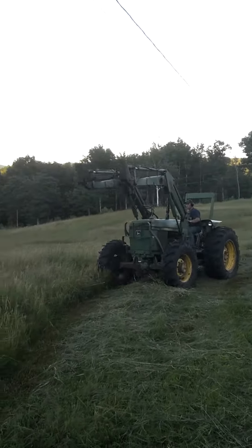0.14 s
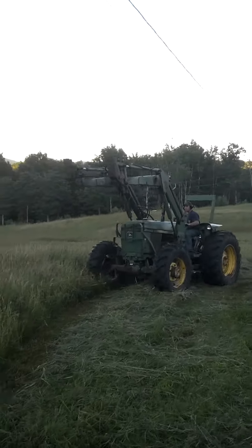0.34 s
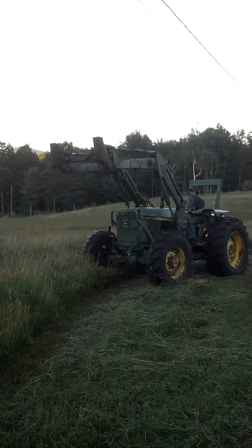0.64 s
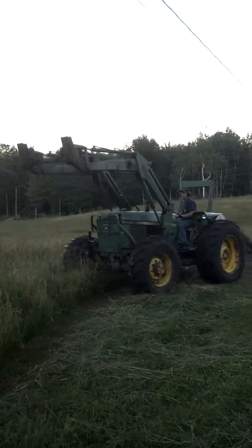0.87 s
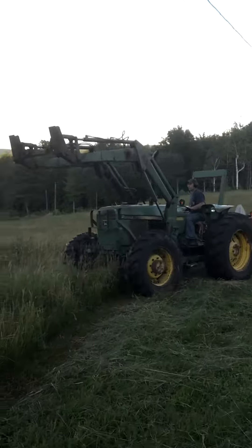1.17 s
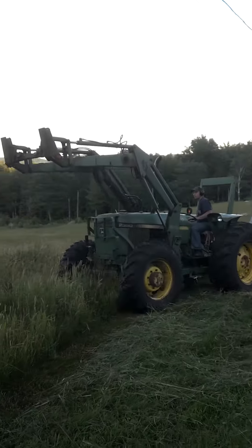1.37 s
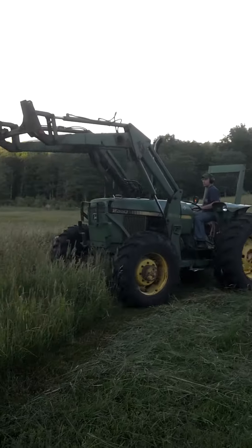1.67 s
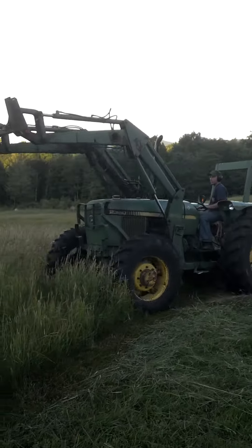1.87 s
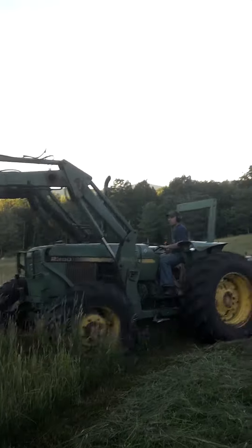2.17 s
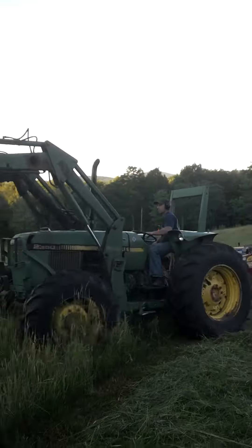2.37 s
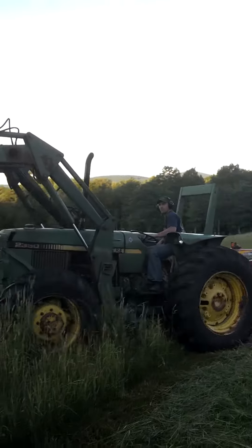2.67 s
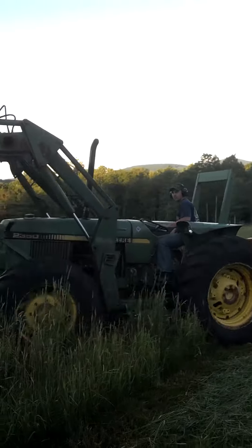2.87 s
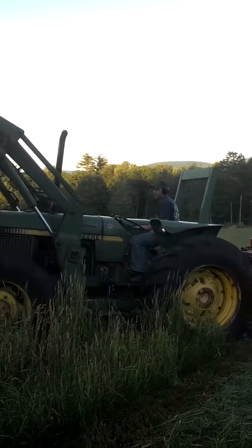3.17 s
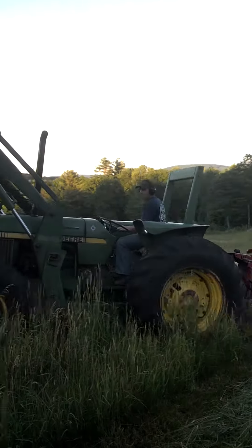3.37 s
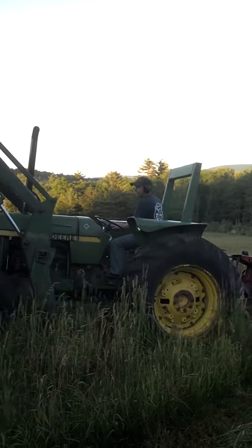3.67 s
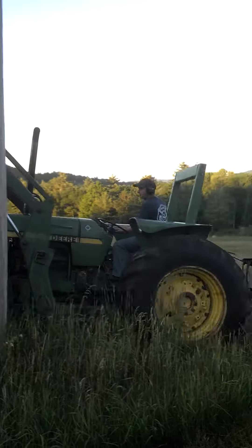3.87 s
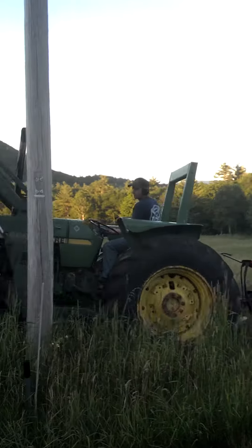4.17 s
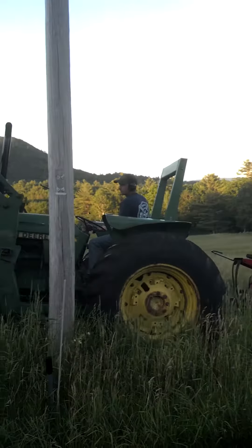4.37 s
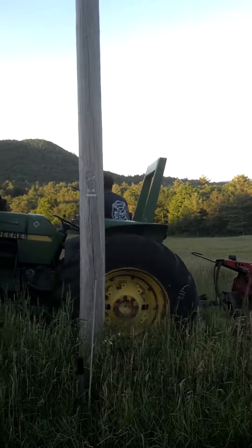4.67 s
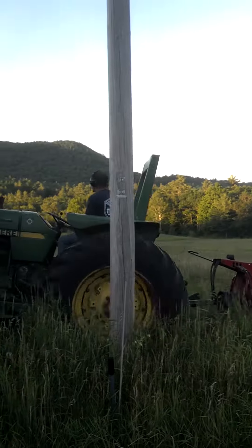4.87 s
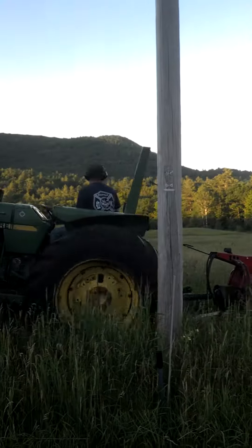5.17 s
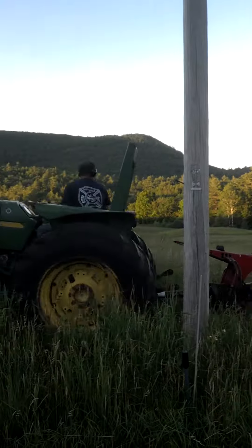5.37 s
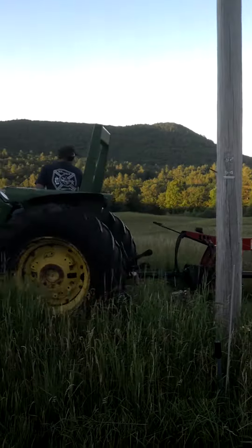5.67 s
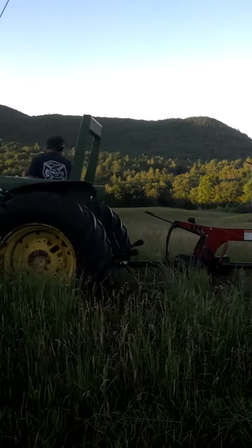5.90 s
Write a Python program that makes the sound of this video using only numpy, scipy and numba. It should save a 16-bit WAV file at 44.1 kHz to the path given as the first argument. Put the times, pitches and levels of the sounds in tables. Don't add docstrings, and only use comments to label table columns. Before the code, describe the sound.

An old diesel tractor works past in an open hayfield, already loud at the start and never stopping. Low exhaust drone and quick hard engine knocks run throughout, with fan hum, a broad mower rush, loose rattles and metal ticks. The fan fades as the tractor turns its flank, and engine speed sags slightly late. Handheld phone at the field edge, stereo, dry outdoors, with only a faint wind puff.

```python
import sys
import numpy as np
from scipy import signal
from scipy.fft import rfft, irfft
from scipy.io import wavfile
from scipy.ndimage import uniform_filter1d
from numba import njit

SR = 44100
rng = np.random.default_rng(int(sys.argv[2]) if len(sys.argv) > 2 else 0)


def inscribe(sig):
    pcm = np.round(np.clip(np.atleast_2d(sig).T, -1, 1) * 32767)
    wavfile.write(sys.argv[1], SR, pcm.astype(np.int16))


def ratio(d):
    e = np.asarray(d, float) / 20
    return 10 ** e


N = 266364
COARSE = 8

# pitch_hz, level_db, likeness (0-1), lag_samples
FAR_PORT = [(90, 0.2, 1, 1.6), (200, 2.5, 0.95, 3.6), (353, -7, 0.96, 12.6), (550, 0, 1, 0.63),
            (816, -10.5, 0.76, 3.6), (1950, 0.5, 0.79, 8.9), (3030, -8, 0, 10.1), (7200, -13, 0.06, 15),
            (9900, -3.5, 0.24, 10.6), (13950, 3.5, 0.7, 39)]
KNOCK_DB = (-10, -6.5, -6.5, -7.5)


def level(x, db):
    return x * ratio(db) / np.sqrt(np.mean(x ** 2))


def curves(table):
    s, *columns = np.transpose(table)
    return [np.interp(np.arange(N) / SR, s, c) for c in columns]


def at_hz(table, hz, column=1):
    rows = np.array(table)
    return np.interp(np.log(hz), np.log(rows[:, 0]), rows[:, column])


def aspect(values):
    facing_s = (0.14, 1.5, 4, 5.5)
    return np.interp(np.arange(N) / SR, facing_s, values)


@njit
def resonate(x, g, k):
    y, b, l = np.empty(len(x)), 0., 0.
    for i in range(len(x)):
        v = (b + g[i] * (x[i] - l)) / (1 + g[i] * (g[i] + k[i]))
        b, l, y[i] = 2 * v - b, l + 2 * g[i] * v, k[i] * v
    return y


def svf(x, hz, width):
    return resonate(x, np.tan(np.pi * hz / SR) * np.ones(N), width / hz * np.ones(N))


def shape(x, response):
    pad = 4096
    padded = np.pad(x, ((0, 0), (pad, pad)), mode="reflect")
    hz = np.fft.rfftfreq(padded.shape[1], 1 / SR) + 1
    return irfft(rfft(padded) * response(hz), padded.shape[1])[:, pad:-pad]


def walk(rate, every=1):
    hold = int(SR / 64 / rate)
    held = np.repeat(rng.standard_normal(N // 64 // hold + 2), hold)
    slewed = uniform_filter1d(uniform_filter1d(held, hold), hold)
    return 1.3 * np.interp(np.arange(0, N, every) / 64, np.arange(len(slewed)), slewed)


def tone(turns, db, start=None):
    free = rng.random()
    return np.sqrt(2) * ratio(db) * np.cos(2 * np.pi * (turns + (free if start is None else start)))


def steady(curve):
    return uniform_filter1d(curve, size=SR // 6)


def wind():
    # start_s, level_db, pitch_hz
    puffs = [
        (.70, -52, 90),
    ]
    t = np.arange(N) / SR
    out = np.zeros((2, N))
    for s, db, hz in puffs:
        swell = ratio(db) * np.exp(-((t - s) / 0.017) ** 2)
        rumble = ratio(-81 + 3.2 * walk(5.7))
        out += (swell + rumble) * [level(svf(rng.standard_normal(N), hz, 110.0), 0) for _ in range(2)]
    return out


def ground(ports):
    # start_s, lag_ms, share
    bounce = [
        (0, 1.9, 0.094),
        (.5, 2.16, 0.14),
        (1.4, 2.48, 0.16),
        (2.1, 2.88, 0.18),
        (3.1, 3.52, 0.22),
        (4.2, 3.524, 0.16),
        (5.4, 3.66, 0.2),
        (6.04, 3.23, 0.25),
    ]
    lag_ms, share = curves(bounce)
    place = np.arange(N) - steady(lag_ms) * SR / 1000
    dull = signal.lfilter(*signal.butter(1, 7000, fs=SR), ports)
    return ports + share * [np.interp(place, np.arange(N), row) for row in dull]


def panels(ports):
    # pitch_hz, share, centre_s, half_span_s
    broad = [(630, 0.87, 0.19, 0.17), (805, -0.38, 0.23, 0.37), (456, 0.48, 2.2, 0.3),
             (7760, -0.5, 1.1, 0.42), (7800, -0.83, 2, 0.28), (7700, 0.15, 3.7, 0.071),
             (327, -0.89, 3.55, 0.11), (538, -0.33, 5.15, 0.12), (1540, 0.19, 1.3, 0.23),
             (206, 0.55, 0.44, 0.13), (1070, -0.092, 4.9, 0.2), (235, -0.61, 1.7, 0.15),
             (235, -.75, 0.78, 0.088), (161, -.4, 0.7, 0.24), (3100, 0.32, 3.7, 0.11),
             (550, -.35, 3.05, .12), (1100, -.25, 4.25, .12), (1100, -.25, 2.8, .12),
             (1740, 0.24, 2.42, 0.16), (1840, 0.25, 4.8, 0.22), (1130, -0.35, 0.75, .12),
             (3100, .5, 1.33, .13), (1550, .3, 3.52, .12), (560, .4, 1.58, .12), (780, .4, 5.48, .13),
             (1550, -.25, 1.1, .12), (11210, -1.17, 2, 1.8), (7930, -0.84, 0.79, 0.8), (657, 0.38, 3, 0.73),
             (4930, 0.36, 2.4, 0.39), (3440, 0.59, 2.65, 0.76), (2720, -0.44, 5.4, 0.48),
             (775, -0.36, 2.9, 0.42), (1870, 0.015, 3.57, 0.44), (368, -0.063, 3.7, 0.48),
             (14040, 1, 3.4, 0.59), (1830, -0.91, 4.15, 0.22), (1920, 0.38, 5.15, 0.23),
             (449, 0.71, 4.9, 1.1), (670, 0.55, 5.2, 0.97), (7200, 0.46, 5.65, 0.062)]
    # pitch_hz, share, centre_s, half_span_s
    thin = [(1024, 0.62, 1.2, 0.42), (482, 1, .9, .2), (476, 0.41, 2.04, 0.19), (1070, 1.3, 1.35, .15),
            (860, .7, 4.25, .15), (560, .7, 4.15, .2), (1030, 1.1, .8, 0.092), (680, .9, 5.5, .2),
            (668, 0.64, 0.74, 0.56), (606, 0.73, 5.16, 0.18), (1210, 0.77, 5.37, 0.14),
            (1310, 0.55, 1.5, 0.1), (652, 0.76, 2.6, 0.78), (1130, 0.92, 0.2, 0.24),
            (1280, 1.1, 1.93, 0.18), (1320, 0.5, 2.47, 0.21), (650, 0.55, 1.5, 0.41),
            (1735, .8, 2.41, 0.14), (1830, 0.74, 2.55, 0.31), (607, 0.92, 2.82, 0.22),
            (2020, 0.87, 3.43, 0.16), (1800, 0.52, 3.4, 0.21), (1480, 0.72, 3.57, 0.21),
            (848, 1.2, 4.06, 0.28), (1430, 0.38, 4.2, 0.089), (1894, 0.94, 4.44, 0.38),
            (1157, 0.44, 4.8, 0.089), (860, 0.87, 5.2, 0.55), (1970, 0.79, 5.33, 0.12),
            (1484, 1, 5.76, 0.19)]
    t, out = np.arange(N) / SR, ports.copy()
    for rows, q in ((broad, 9.6), (thin, 36)):
        for hz, share, s, span in rows:
            near = np.abs(t - s) < 3 * span
            rung = signal.lfilter(*signal.iirpeak(hz, q, fs=SR), ports[:, near])
            out[:, near] += share * np.exp(-((t[near] - s) / span) ** 2 / 2) * rung
    return out


def fan():
    blade_hz = 95.7
    blade_db, octave_db = (-41.5, -41.5, -51, -61), (-42, -40, -50, -47)
    turns = np.cumsum(blade_hz + 0.39 * walk(1.584)) / SR
    blade = tone(turns, aspect(blade_db) + 0.35 * walk(2.5))
    octave = tone(2 * turns + 0.066 * walk(6.7), aspect(octave_db) + 2 * walk(4.7))
    return blade + octave


def clatter(rate=400, tail_s=0.004):
    struck = rng.random(N) < rate / SR
    ticks = struck * ratio(np.minimum(2 * rng.exponential(size=N), 6))
    return level(signal.lfilter([1], [1, -np.exp(-1 / (tail_s * SR))], ticks), 0)


def hard_blows():
    # start_s, peak_db
    blow_peaks = [(0.1476, -18), (0.4484, -21), (0.5013, -10), (0.6903, -17), (0.7143, -18), (0.7831, -21),
                  (1.1313, -14), (1.1578, -14.5), (1.3334, -20), (1.3633, -23), (1.4351, -30),
                  (1.5229, -21), (1.6876, -14), (1.7744, -18), (1.8886, -16.5), (1.9759, -23.5),
                  (2.2792, -16.5), (2.3426, -16.5), (2.3932, -20), (2.4438, -16), (2.596, -13.5),
                  (2.6479, -20), (2.6973, -19), (2.7995, -17), (2.8394, -15), (2.9008, -14), (2.9267, -17),
                  (2.9522, -20), (3.0021, -24), (3.1043, -19), (3.1552, -14), (3.2046, -14), (3.2829, -14),
                  (3.3064, -15), (3.4087, -16), (3.4595, -7), (3.5344, -8), (3.6865, -15.5), (3.8132, -11),
                  (3.8392, -8), (3.8636, -21), (3.914, -12), (4.4727, -6), (4.7277, -18), (4.7805, -15),
                  (4.9601, -14), (4.9856, -12.5), (5.0634, -16), (5.1163, -11), (5.1806, -18),
                  (5.233, -9.5), (5.2959, -11), (5.3956, -15.5), (5.5233, -20.5), (5.6002, -21),
                  (5.7019, -16), (5.8042, -14.5), (5.906, -18), (5.9564, -14.5), (6.0077, -16)]
    lift_db, tail_s = 18, 0.003
    s, db = np.transpose(blow_peaks)
    power = ratio(2 * (np.minimum(db, -14) + lift_db))
    hits = np.bincount((s * SR).astype(int), power, N)
    return signal.lfilter([1], [1, -np.exp(-1 / (tail_s * SR))], hits)


def jolts():
    # centre_s, level_db
    clumps = [(0.049, 2), (.15, 4), (.61, 0), (0.729, 4), (.79, 0.5), (.9, 1.5), (1.01, -1.5), (1.18, 2.5),
              (1.51, -1), (1.64, 1), (1.8, -1.5), (2.03, 0), (2.17, 1.5), (2.45, 0.5), (2.6, 0), (2.68, -1),
              (2.86, 1.5), (3.02, 0), (3.18, -0.5), (3.31, 2), (3.45, 0.5), (3.54, -2), (3.63, 2.5),
              (3.7, 2.5), (3.97, -1), (4.12, -1), (4.22, -1.5), (4.62, 3), (4.74, -0.5), (4.87, 0.5),
              (5.03, -1), (5.11, 2.5), (4.47, 2), (5.17, 0), (5.25, 1.5), (5.4, -0.5), (5.58, -2.5),
              (5.7, 0), (5.96, 2), (6.02, 1)]
    half_span_s = 0.013
    t = np.arange(0, N, 64) / SR
    swing_db = sum(db * np.exp(-((t - s) / half_span_s) ** 2 / 2) for s, db in clumps)
    return np.interp(np.arange(N) / SR, t, swing_db)


def knock(cycle, decay=0.39, uneven=0.88, size=24):
    cylinder_db = (-4, -2, -1, 2.5)
    firing = 4 * cycle + 1.03
    index = firing.astype(int)
    scatter_db = 1.1 * rng.standard_normal(index[-1] + 1)
    size_db = uneven * np.array(cylinder_db)[index % 4] + scatter_db[index]
    blows = ratio(size_db) * np.exp(-(firing % 1) / decay)
    return level(uniform_filter1d(blows, size=size), 0)


def block(cycle, level_db):
    # pitch_hz, width_hz, level_db
    modes = [(1186, 190, -2), (1960, 210, -7), (2820, 210, -4), (3720, 400, -7.5), (4830, 260, -8)]
    fronts = np.maximum(np.gradient(knock(cycle, uneven=0.6)), 0)
    fronts = np.maximum(np.gradient(fronts), 0)
    rings = sum(level(svf(fronts, hz, width), db + 3.2 * walk(1.66)) for hz, width, db in modes)
    return level(rings, level_db)


def machine(cycle, body_db):
    # pitch_hz, level_db (per Hz)
    noise = [(60, -11), (120, -11.5), (200, -5), (400, -2.5), (650, -3), (1300, -7), (2400, -2.5),
             (4000, -11.5), (6000, -17), (8500, -16), (10000, -25), (11500, -35.5), (13000, -25),
             (15500, -27.5)]
    valve_uneven = (.7, 1.1, 1.7, .7)
    # layers against the body (dB), bonnet ring (Hz), knock depth (0-1)
    whine_db, hiss_db = (-5.5, -5, -4.5, -4), (-17.5, -18.5, -18, -19.5)
    ring_hz, knock_depth = (1140, 1335, 1270, 1290), (0.53, 0.64, 0.7, 0.59)
    reel_hz, reel_peak_s, reel_db = 2.37, 2.09, (0.47, 0.25, 0.24, 0.21)

    out, t = np.zeros((3, N)), np.arange(N) / SR
    ticks = (0.32 * clatter()) ** 2 + hard_blows()
    reel = aspect(reel_db) * np.cos(2 * np.pi * reel_hz * (t - reel_peak_s))
    shared = 1.2 * walk(12) + 0.75 * walk(5.94) + reel
    struck = [knock(cycle) ** 2 - 1 + ticks for _ in range(4)]
    valves = knock(cycle, decay=0.42, uneven=aspect(valve_uneven), size=110) ** 2 - 1 + ticks
    depth = np.clip(aspect(knock_depth), 0, 1)
    slow = slice(0, N, 4 * COARSE)
    body = body_db[slow]
    jolt_db = jolts()[slow]
    layers = [c[slow] - c.mean() for c in map(aspect, (whine_db, KNOCK_DB, hiss_db))]

    for hz in 60 * 2 ** np.arange(0, 8.1, 1 / 4):
        treble = hz > 6000
        knocky = depth * np.clip(np.log2(hz / 500) / 2.24, 0, 1) * (0.85 if treble else 1)
        blows = valves if treble else struck[int(np.log2(hz) * 1.5) % 4]
        gate = np.sqrt(1 + knocky ** 2 * blows)
        knocky = knocky[slow]

        weights = [np.interp(np.log(hz), np.log([1200, 2100, 4500, 13000]), row) for row in np.eye(4)[1:]]
        swing = sum(w * c for w, c in zip(weights, layers))
        db = at_hz(noise, hz) + 10 * np.log10(hz / 1000) + body - 6.5 + swing
        db = db + np.clip(np.log2(hz / 250) / 2.1, 0, 1) * jolt_db
        db = db + knocky * shared[slow]
        db = db + 0.85 * (1 - knocky) * walk(1.5, slow.step)
        db = db + (1.6 - knocky) * walk(8, slow.step)
        db = db - 0.5 * knocky * (body - body_db.mean())
        gate = gate * np.interp(t, t[slow], ratio(db))

        bands = [svf(svf(rng.standard_normal(N), hz, hz / 3), hz, hz / 3) for _ in range(2)]
        near, own = [gate * level(band, 0) for band in bands]
        like = np.clip(at_hz(FAR_PORT, hz, column=2), 0, 1)
        far = ratio(at_hz(FAR_PORT, hz))
        out += [near, far * like * near, far * np.sqrt(1 - like ** 2) * own]
    bonnet_hz = aspect(ring_hz)
    return out + 0.77 * np.array([svf(row, bonnet_hz, 213.0) for row in out])


def drone(cycle, body_db):
    # multiple of the cycle, then nose_db, quarter_db, flank_db, tail_db
    strong_orders = [(4, -46.5, -48.5, -55.5, -58), (8, -35, -42, -38, -40.5), (10, -42.5, -45.5, -50, -42),
                     (11, -52, -45.5, -45.5, -37), (12, -34, -40, -33.5, -35.5), (16, -45, -45.5, -43, -41),
                     (20, -49, -47, -46.5, -43), (24, -45, -43, -47.5, -42), (28, -55, -42, -45.5, -50),
                     (32, -43, -45.5, -48.5, -53)]
    # pitch_hz, level_db
    weak_orders = [(100, -47), (140, -19.5), (300, -25.5), (600, -26), (800, -33), (1200, -28.5),
                   (2400, -31)]
    even_db, firing_db = 2, 4
    pulse_turns = 0.531
    cycle, body_db = cycle[::COARSE], body_db[::COARSE]
    strong = {round(k): db for k, *db in strong_orders}
    out = 0
    for k in list(range(5, 61)) + list(range(64, 124, 4)) + [4]:
        if k in strong:
            db = aspect(strong[k])[::COARSE] + 1.3 * (body_db - body_db.mean())
            db = db + 0.52 * walk(3.08, COARSE)
            start = None if k % 4 else -k * pulse_turns
            out = out + tone(k * cycle, db, start)
        else:
            db = at_hz(weak_orders, k * 19.7) + even_db * (k % 2 == 0) + firing_db * (k % 4 == 0)
            db = body_db + db + 4 * walk(6, COARSE)
            start = None if k % 4 == 2 else -k * pulse_turns
            out = out + tone(k * cycle + 0.19 * walk(8, COARSE), db, start)
    return signal.resample_poly(out, COARSE, 1, padtype="reflect")[:N]


def scene():
    # start_s, level_db
    surges = [(0.0, -26), (0.55, -24), (0.87, -23.5), (0.94, -25.5), (1.6, -23.5), (1.87, -26),
              (2.03, -22.5), (2.14, -26.5), (2.39, -24.5), (3.06, -26.5), (3.75, -24), (3.88, -26.5),
              (4.27, -24.5), (4.32, -27), (4.86, -23), (5.18, -26.5), (5.26, -24), (6.04, -24.5)]
    # start_s, cycle_rate_hz
    speed = [(0.0, 19.85), (0.5, 19.82), (1.0, 19.83), (1.5, 19.81), (2.0, 19.83), (2.4, 19.72),
             (2.8, 19.7), (3.2, 19.76), (3.6, 19.74), (4.0, 19.71), (4.3, 19.7), (4.6, 19.58), (4.9, 19.44),
             (5.15, 19.45), (5.4, 19.56), (5.7, 19.61), (6.04, 19.62)]
    body_db = curves(surges)[0] - 3.5
    cycle = np.cumsum(steady(curves(speed)[0])) / SR + 0.051
    near, shared, own = machine(cycle, body_db)
    tones = drone(cycle, body_db) + fan()
    tones += block(cycle, body_db + aspect(KNOCK_DB) - 7.5)
    shaded = shape(np.array([tones]), lambda hz: ratio(at_hz(FAR_PORT, hz)))
    late = shape(shared + shaded,
                 lambda hz: np.exp(-2j * np.pi * hz * at_hz(FAR_PORT, hz, column=3) / SR))
    return panels(ground(np.array([near + tones, late[0] + own]))) + wind()


def band_limit(x):
    return signal.sosfilt(signal.butter(12, 16860, fs=SR, output="sos"), x)


def record(dry):
    delay = 16
    crossed = dry - np.roll(dry[::-1], delay, axis=1)

    def bass(hz):
        lift = 0.5 / np.sin(np.pi * np.clip(hz, 40, 460) * delay / SR)
        return lift * (1 / np.sqrt(1 + (77 / hz) ** 18) + 0.011)

    heard = shape(crossed, bass)
    return band_limit(heard)


dry = scene()
out = record(dry)
inscribe(out)
```